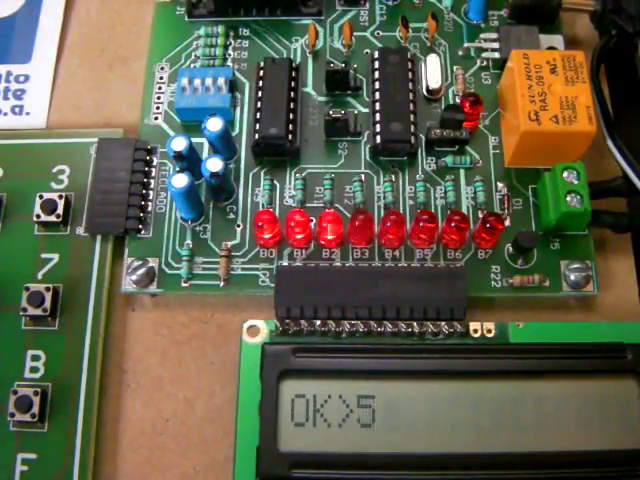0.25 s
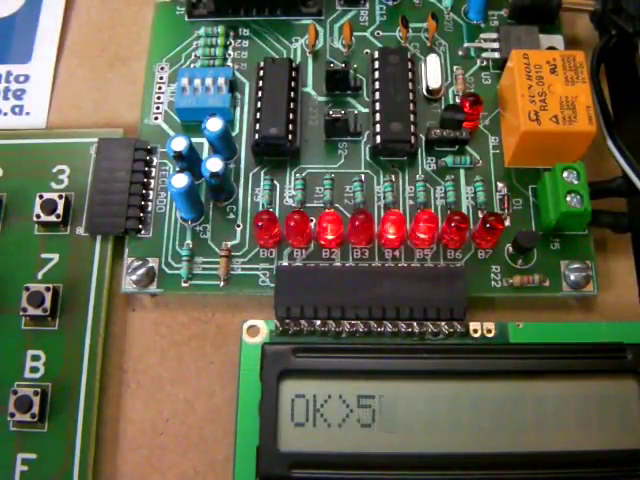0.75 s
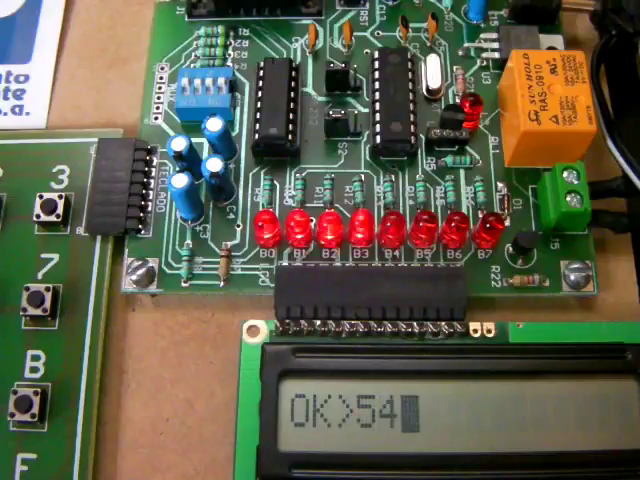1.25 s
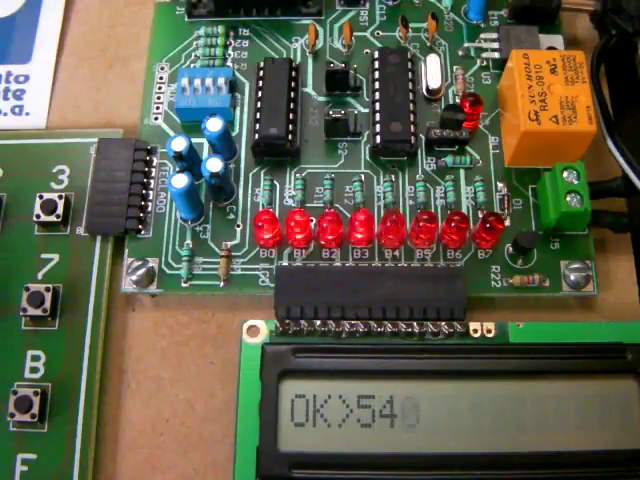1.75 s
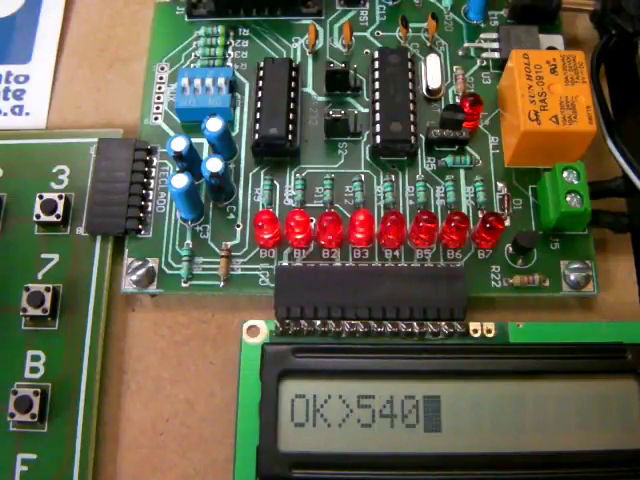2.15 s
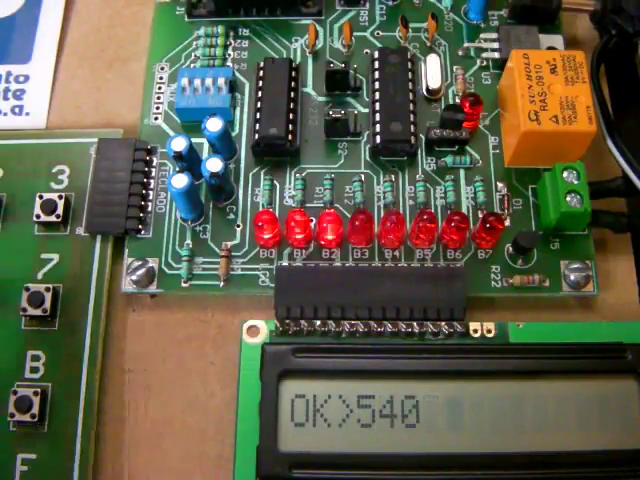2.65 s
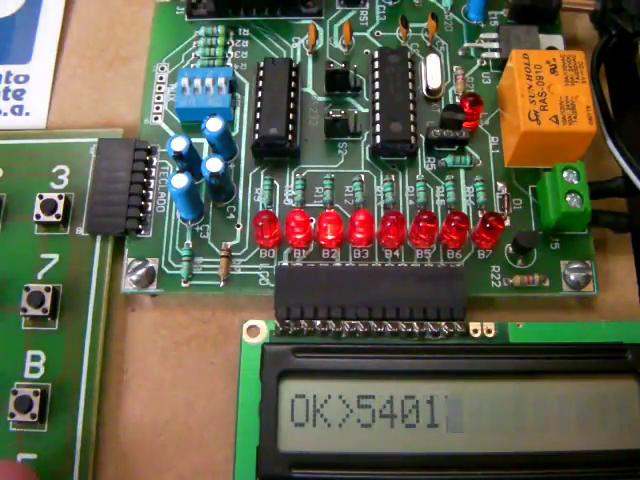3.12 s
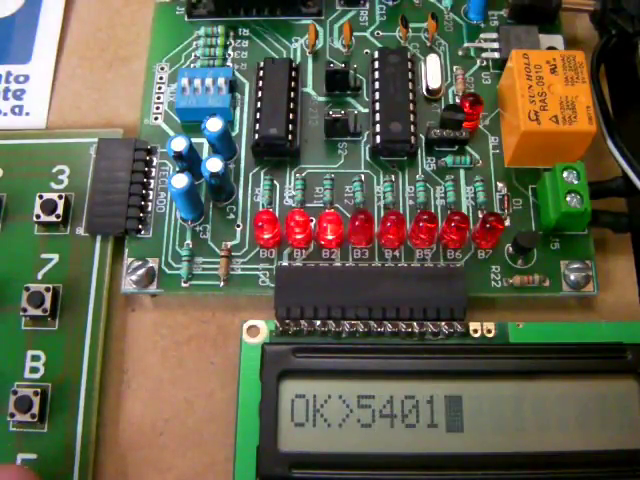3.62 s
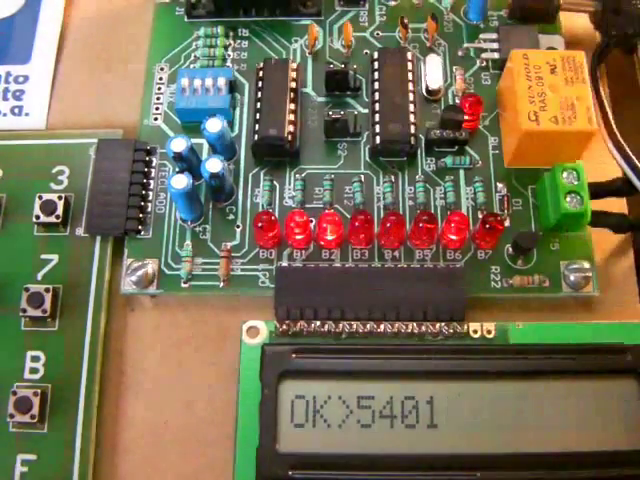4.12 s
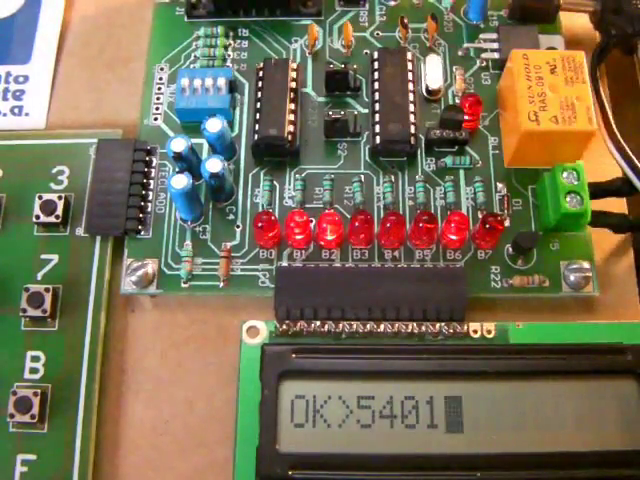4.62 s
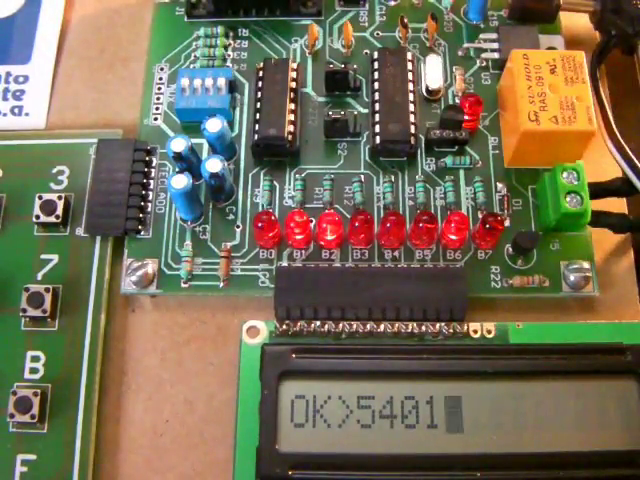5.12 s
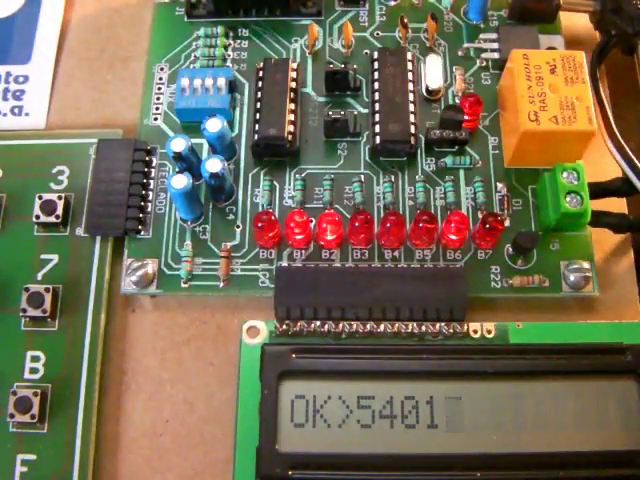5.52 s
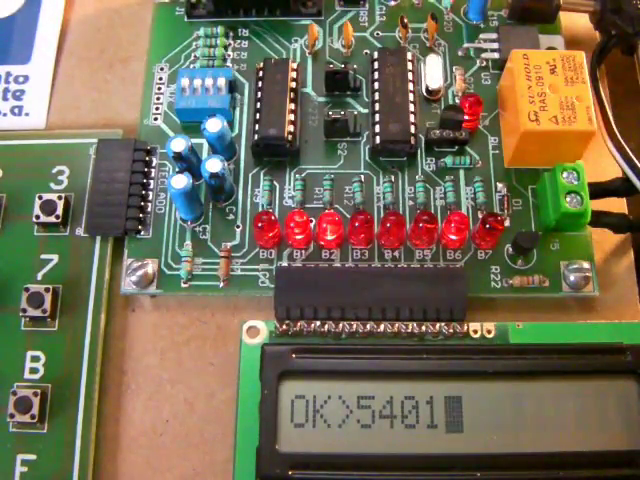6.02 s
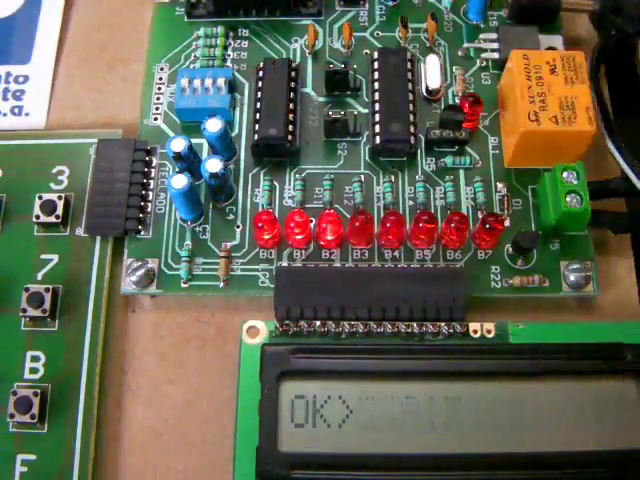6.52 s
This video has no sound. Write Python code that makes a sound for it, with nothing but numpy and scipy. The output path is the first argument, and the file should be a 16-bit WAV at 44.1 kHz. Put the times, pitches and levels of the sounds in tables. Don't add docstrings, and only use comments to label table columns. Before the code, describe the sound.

A low, gently wavering fan rumble and hum with soft microphone hiss runs throughout, in a quiet room. Very close, small buttons on a circuit board crack sharply, each with a short ring of housing, board and table. A bright press at 0.47 s is answered by a duller release at 0.68, with a small tick at 0.75. The next pair comes at 1.38 and 1.6, both loud. A softer press at 2.32 has only a faint, knocky release at 2.53, then a light nail tick. Around 3.2 a wrist lands with a dull double thump. Snaps follow at 3.49, 3.78 and 4.01, amid the strongest finger brushing, which fades after 4.3, with small ticks near 4.5. Only fan and hiss remain until a lone crack at 6.37, a tiny tick at 6.57 and a faint rustle near 6.8.

```python
import sys
import numpy as np
from scipy import signal
from scipy.fft import rfft, irfft, next_fast_len
from scipy.io import wavfile
from scipy.ndimage import map_coordinates

SR = 44100
rng = np.random.default_rng(int(sys.argv[2]) if len(sys.argv) > 2 else 0)


def volts(x):
    e = np.asarray(x, float) / 20
    return 10 ** e


def generate_wav(signal):
    frames = np.transpose(np.atleast_2d(signal))
    scaled = np.clip(frames, -1, 1) * 32767
    pcm = np.round(scaled).astype(np.int16)
    wavfile.write(sys.argv[1], SR, pcm)


N = 298557


def unit(x):
    return x / np.sqrt(np.mean(x ** 2) + 1e-20)


def along(points, hz):
    f, v = np.transpose(points)
    return np.interp(np.log(hz + 1), np.log(f + 1), v)


def peak(f, hz, width, db):
    return volts(db) / (1 + ((f - hz) / width) ** 2)


def filtered(x, response):
    m = next_fast_len(x.shape[-1] + 4096)
    return irfft(rfft(x, m) * response(np.fft.rfftfreq(m, 1 / SR)), m)[..., :x.shape[-1]]


def noise(gain, likeness, size):
    turn = lambda hz: np.arccos(np.clip(likeness(hz), -1, 1)) / 2
    split = lambda hz: gain(hz) * [np.cos(turn(hz)), np.sin(turn(hz))]
    mid, side = filtered(rng.standard_normal((2, size)), split)
    return unit(np.array([mid + side, mid - side]))


def ring(modes, t, rise, rough):
    chance = rng.standard_normal((2, 2, len(modes), len(t)))
    pole = np.exp(-2 * np.pi * 40 / SR)
    drift = signal.lfilter([1], [1, -pole], chance[0] + 1j * chance[1])
    beats = unit(drift.view(float)).view(complex)
    waver = 1 + rough * (beats[0] + 0.33 * beats[1] * [[[1]], [[-1]]])
    hz, db, t60 = np.transpose(modes)[:, :, None]
    swell = (1 - np.exp(-t * hz / rise)) * volts(db - 60 * t / t60)
    cycles = hz * t + 0.12 * rng.random(hz.shape)
    return np.sum(swell * waver * np.exp(2j * np.pi * cycles), axis=1).imag


def add(track, x, s):
    part = track[:, round(s * SR):][:, :x.shape[-1]]
    part += x[..., :part.shape[-1]]


def sway(rate):
    return map_coordinates(rng.standard_normal(200), [np.arange(N) * rate / SR])


# pitch_hz, likeness (0-1)
ALIKE = [(25, 0.862), (80, 0.95), (200, .96), (550, 0.8), (1650, 0.58), (5000, .03), (15000, 0.027)]


def layer(spectrum):
    return noise(lambda f: volts(along(spectrum, f)), lambda f: along(ALIKE, f), size=N)


# pitch_hz, density_db (per Hz)
RUMBLE = [(12, -74), (20, -47), (43, -13), (65, -13.5), (80, -9), (124, 0), (177, -4.5), (239, -5.5),
          (267, -6), (301, -6), (332, -11.5), (350, -11.5), (396, -13.5), (424, -14.5), (520, -34),
          (680, -52.5), (1140, -120)]
# pitch_hz, density_db (per Hz)
RUSH = [(240, -36.5), (400, 0.5), (425, -9), (548, -6.5), (930, -14.5), (1010, -14.5), (2500, -22),
        (3250, -43), (5500, -120)]
# pitch_hz, width_hz, level_db
HUM = [(122.6, 9.7, -43), (92.8, 7.27, -48), (175, 15.7, -48.5), (356, 8.8, -55.5)]
# pitch_hz, level_db
WHINE = [(328.4, -47.5), (990.5, -78), (1319, -69)]


def fan():
    swaying = volts(0.87 * sway(3.48))
    flow = swaying * (volts(-39) * layer(RUMBLE) + volts(-48) * layer(RUSH))
    hum = sum(volts(db) * noise(lambda f: peak(f, hz, width, 0), lambda f: 1.0 + 0 * f, size=N)
              for hz, width, db in HUM)
    whine = sum(volts(db + 2.5) * np.sin(2 * np.pi * hz * np.arange(N) / SR) for hz, db in WHINE)
    return flow + hum + whine


# pitch_hz, density_db (per Hz)
HISS = [(1060, -11), (1800, -8.5), (2570, -4.5), (3570, -4), (6000, -7.5), (7800, -43), (13200, -120)]
# pitch_hz, density_db (per Hz)
FIZZ = [(3530, -25), (6000, -2), (7870, -2), (8720, -2), (13400, -5), (15000, -5.5), (16000, -10.5)]
# loudest_s, rise_s, fall_s, dull_db,
# bright_db
SWELLS = [(.15, .3, .35, -58.5, -55.5), (.62, .08, .15, -51, -54), (1.5, 0.15, 0.14, -49, -54),
          (2.8, 0.2, .2, -54.5, -49.5), (3.5, 0.076, 0.087, -48, -47), (3.82, 0.084, 0.15, -46, -52),
          (4.0, 0.066, 0.15, -43, -40.5), (4.2, 0.13, .24, -45.5, -43), (4.5, 0.11, 0.45, -55, -57),
          (3.65, .1, .1, -58, -56), (1.1, .2, .2, -63, -62), (1.8, .1, 0.36, -58, -59.5),
          (2.4, .15, .1, -54, -62), (3.05, .1, 0.18, -59, -60), (6.8, .2, .1, -50.5, -48)]


def hiss_and_swells():
    s, rise, fall, dull_db, bright_db = np.transpose(SWELLS)[:, :, None]
    t = np.arange(N) / SR - s
    stroke = np.exp(-(t / np.where(t < 0, rise, fall)) ** 2)
    brushed = lambda floor_db, db: np.sqrt(volts(2 * floor_db) + np.sum(volts(2 * db) * stroke ** 2, axis=0))
    return brushed(-56, dull_db) * layer(HISS) + brushed(-55.5, bright_db) * layer(FIZZ)


# start_s, peak_db, pitch_hz, length_s
TICKS = [(0.13, -48, 3730, 0.035), (0.256, -45, 4760, .03), (0.754, -25, 3660, .014),
         (0.758, -36, 5300, .014), (0.771, -35, 3630, 0.014), (0.787, -39, 5330, 0.021),
         (1.088, -48, 5400, 0.026), (1.995, -46, 3020, 0.019), (2.027, -41.5, 7400, 0.016),
         (2.557, -32.5, 4600, 0.021), (2.56, -31.5, 7660, 0.023), (3.007, -41, 5000, 0.019),
         (3.21, -35, 550, 0.09), (3.25, -41, 1400, 0.07), (3.752, -35, 8400, .012),
         (4.45, -41.5, 1620, 0.035), (4.486, -39.5, 2230, 0.028), (4.625, -61, 3000, .025),
         (6.565, -42, 1100, 0.021)]
# pitch_hz, level_db
CAP = [(3600, -6), (5450, -9), (7450, -10.5)]


def finger_ticks():
    out, t = np.zeros((2, N)), np.arange(SR // 4) / SR
    for s, db, hz, length in TICKS:
        nail = lambda f: (0.13 * (f > 1200) * (f < 7800)
                          + sum(peak(f, c, 0.051 * c, level) for c, level in CAP + [(hz, -0.5)]))
        skin = lambda f: 1 / (1 + ((f - hz) / (0.49 * hz)) ** 4)
        puff = np.e * t / (0.24 * length) * np.exp(-t / (0.33 * length))
        sound = noise(skin if hz < 2500 else nail, lambda f: 0.91 + 0 * f, size=len(t))
        add(out, volts(db - 10) * puff * sound, s - 0.54 * length)
    return out


# start_s, level_db, pitch_hz, t60_s
BUMPS = [
    (3.2, -24.5, 105.8, 0.19),
    (3.253, -22, 104.5, 0.17),
]


def wrist_bumps():
    out, t = np.zeros((2, N)), np.arange(SR // 4) / SR
    for s, db, hz, t60 in BUMPS:
        modes = [(hz, db + 11.5, t60), (2.22 * hz, db - 9, 0.6 * t60)]
        add(out, ring(modes, t, 3.0, rough=0.055), s - 0.015)
    return out


# pitch_hz, likeness (0-1)
PORTS = [(300, 0.83), (1500, 0.96), (3500, 0.65), (6000, 0.92), (12000, 0.53)]


def ports(f):
    return along(PORTS, f)


def dulled(f, dull):
    return volts(-dull * np.log2(np.maximum(f / 2880, 1)))


KEYS = {"a": (-3.5, -4.5, -2.5, .15), "b": (-9.5, -6, -7.5, .34), "c": (-4, -1, -1, 0.22),
        "d": (-8, 1.7, -0.5, 0.28), "e": (-9.5, -3.5, -3.5, 0.32), "f": (-8.5, -5.5, -5, .35)}


def crack_colour(key, f):
    low_db, mid_db, top_db, _ = KEYS[key]
    shares = [(100, low_db - 1.5), (800, low_db - 3.5), (1500, low_db + 2.5), (3000, 0.0045),
              (6000, mid_db - 0.5), (11000, top_db + 1.5), (15000, top_db - 2.5)]
    return volts(along(shares, f))


def crack(key, dull, age):
    sharp = noise(lambda f: crack_colour(key, f) * dulled(f, dull), ports, size=len(age))
    return np.exp(-(age / 0.003) ** 3) * sharp


DOMES = {"a": [(1400, 280, -3), (2415, 300, -2), (2940, 540, -0.5), (5700, 400, -11), (9340, 600, -4),
         (11400, 400, -5)], "b": [(2814, 230, -4.5), (3630, 350, -0.5), (4760, 330, -6.5), (7710, 500, -6),
         (10220, 390, -8), (14200, 900, -8), (2250, 260, -10.5)], "c": [(1468, 300, 1.5), (3000, 400, -7),
         (4340, 240, -5.5), (5530, 270, -10), (9630, 900, -6), (14600, 1300, -8)], "d": [(3010, 780, -2),
         (3600, 460, -0.5), (4770, 420, -2.5), (5850, 230, -4), (8850, 910, -1), (9870, 300, -7),
         (13080, 550, 1)], "e": [(2600, 850, -1.5), (7460, 940, 0), (8160, 310, 0), (9370, 330, 0),
         (10440, 260, -2), (12600, 510, -6)], "f": [(2900, 370, -1.5), (3820, 250, -9), (5200, 550, -1),
         (6680, 270, -6.5), (8030, 290, -7), (9890, 480, -9)]}


def dome(key, dull, age):
    hz, width, level = np.transpose(DOMES[key])[:, :, None]
    skew = np.arccos(ports(hz)) / 2 * rng.standard_normal(hz.shape) * [[[1]], [[-1]]]
    swell = (1 - np.exp(-age * hz / 2.5)) * np.exp(-1.5 * width * age)
    strength = volts(level) * dulled(hz, dull) ** 1.25 * (width / 300) ** 1.37
    click = np.sum(strength * swell * np.sin(2 * np.pi * hz * age + skew), axis=1)
    return click * np.exp(-(age / 0.0065) ** 2)


def afterglow(key, dull, share, size):
    tint = lambda f: (f > 900) * (1 + 0.5 * sum(peak(f, *mode) for mode in DOMES[key]))
    colour = lambda f: tint(f) * crack_colour(key, f) * dulled(f, dull) ** share
    return noise(colour, lambda f: 0.88 * ports(f), size=size)


def room_tail(key, dull, age):
    decay = volts(-60 * age / 0.31) + volts(9 - 60 * age / 0.047)
    rattle = map_coordinates(rng.standard_normal(400), [age * 260])
    return decay * afterglow(key, dull, 0.85, len(age)) * volts(1.4 * rattle - 0.3)


def lead_in(t, s):
    reach = ((s * SR - 135) % 1024 + 1024) / SR
    block = np.sin(np.pi / 2 * np.clip((t + reach) / 0.019, 0, 1)) ** 1.3
    return block * (volts(3 + 60 * t / 0.16) + volts(5 + 60 * t / 0.019))


def snap_haze(key, dull, t, age, early):
    late = 1.24 * np.exp(-(age / 0.019) ** 2)
    return np.where(t < 0, early, late) * afterglow(key, dull, 0.55, len(t))


HOUSINGS = {"a": [(1465, -2), (2520, -12), (3560, -6), (4090, -12), (4670, -10), (5920, -7), (7370, -12),
            (10300, -10)], "b": [(1840, -5), (2300, -5), (3050, -5), (3600, 0.5), (4650, -5), (5250, -10),
            (6280, -9), (10100, -7), (13300, -9)], "c": [(1270, -4), (1500, 0), (3690, -16), (5040, -3),
            (9230, -12), (9790, -8), (12400, -10), (13100, -11)], "d": [(1480, 1), (1740, -9), (3540, -8),
            (4590, -2), (5220, 0), (5600, -5), (6470, -6), (9080, -2), (12100, -10)], "e": [(2440, -1),
            (3050, -3), (3710, -1), (5280, -4), (6910, -8), (9850, 0), (10500, -4), (13700, -9)],
            "f": [(1070, -6), (2940, -6), (3460, -9), (5250, -2), (5570, 3.5), (6680, -4), (8020, -8)]}
# pitch_hz, width_hz, level_db
BOARD = [(1780, 40, -9.5), (3735, 37, -8.5)]


def housing(key, dull, t, age, early):
    bands = lambda f: (dulled(f, dull) * sum(peak(f, hz, 78, db) for hz, db in HOUSINGS[key])
                       + sum(peak(f, hz, width + 29, db) for hz, width, db in BOARD))
    decay = volts(-60 * age / KEYS[key][3]) + volts(1.5 - 60 * age / 0.057)
    life = np.where(t < 0, volts(-14) * early, decay)
    return life * noise(bands, ports, size=len(t))


# pitch_hz, level_db, t60_s
KNOCK = [(778, 1, 0.16), (809, -2.5, 0.22), (1073, -2, 0.08), (1193, 2, 0.073), (1312, -1, 0.062)]
# pitch_hz, level_db, t60_s
TABLE = [(327, 0.5, 0.28), (350, -2, 0.33), (162.8, -8, 0.26)]


def board_and_table(knock_db, table_db, age):
    knock = volts(knock_db - 6) * ring(KNOCK, age, 4.5, rough=0.5)
    return knock + volts(table_db + 1) * ring(TABLE, age, 1.6, rough=0.38)


# key, start_s, crack_db, dome_db, dullness_db (per octave)
SNAPS = [
    ("a", 0.4666, -1.3, -8, 0.1),
    ("a", 0.683, -6.5, -4.5, 7.5),
    ("b", 1.3836, -2, -4, 0.1),
    ("b", 1.5981, -1.1, 2.5, 8),
    ("c", 2.3248, -10, -8, 0.1),
    ("c", 2.5345, -25, -13, 8.6),
    ("d", 3.4948, -4.5, -10, 0.1),
    ("d", 3.7806, -1.1, -0.92, 8),
    ("e", 4.0076, -2, -12, 0.1),
    ("f", 6.3742, -4, -4.5, 0.1),
]
# tail_db, housing_db, knock_db, table_db
AFTER = [(-25, -26, -24, -30.5), (-27.5, -22.5, -15.5, -21.5), (-23.5, -29.5, -24, -31.5),
         (-26, -26.5, -20, -26.5), (-24, -26, -23.5, -31), (-41.5, -34.5, -20, -19.5),
         (-25, -27.5, -25.5, -47), (-27.5, -30.5, -26, -35), (-21, -25.5, -37, -29.5),
         (-23.5, -30.5, -22, -23)]


def switches():
    out, lead = np.zeros((2, N)), 0.05
    t = np.arange(SR // 2) / SR - lead
    age = np.maximum(t, 0)
    for (key, s, db, dome_db, dull), (tail_db, housing_db, knock_db, table_db) in zip(SNAPS, AFTER):
        early = lead_in(t, s)
        direct = volts(db - 5) * crack(key, dull, age) + volts(tail_db) * room_tail(key, dull, age)
        snap = (t >= 0) * direct
        snap = snap + volts(dome_db + 5.5) * dome(key, dull, age)
        snap = snap + volts(housing_db) * housing(key, dull, t, age, early)
        snap = snap + board_and_table(knock_db, table_db, age)
        snap = snap + volts(tail_db - 3.6) * snap_haze(key, dull, t, age, early)
        add(out, snap, s - lead)
    return out


def scene():
    room = fan() + hiss_and_swells()
    board = finger_ticks() + wrist_bumps() + switches()
    return room * volts([[-0.4], [0.4]]) + board * volts([[-0.1], [0.1]])


def top_cut(x):
    return signal.sosfilt(signal.butter(12, 16360, fs=SR, output="sos"), x)


def record(dry):
    clipped = dry / (1 + np.abs(dry / 0.83) ** 8) ** (1 / 8)
    notch = lambda f: 1 - 0.85 / (1 + ((f - 7920) / 70) ** 2)
    low_pass = lambda f: 1 / (1 + (f / 15800) ** 120)
    finished = filtered(clipped, lambda f: notch(f) * low_pass(f))
    return top_cut(finished)


dry = scene()
out = record(dry)
generate_wav(out)
```